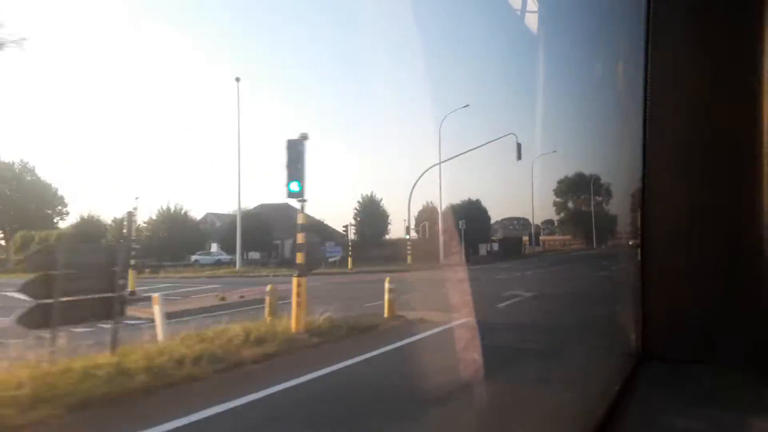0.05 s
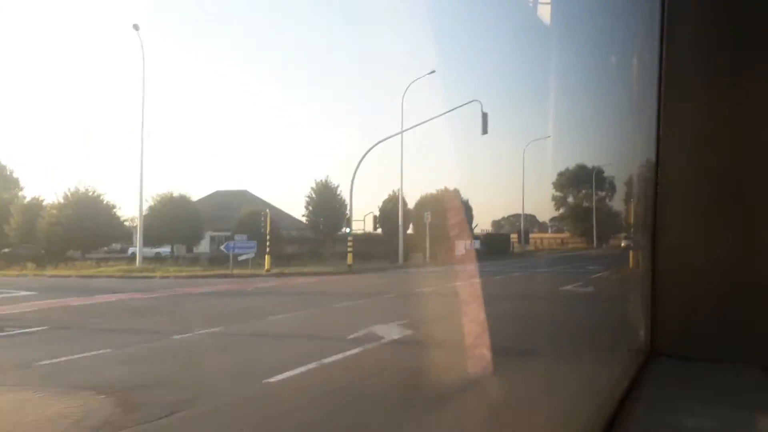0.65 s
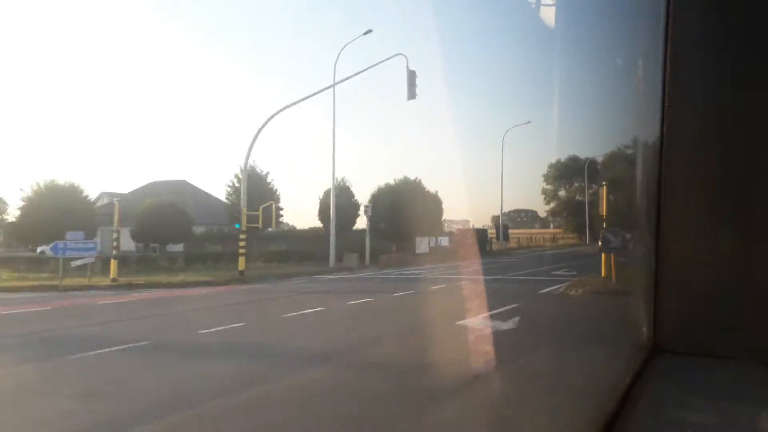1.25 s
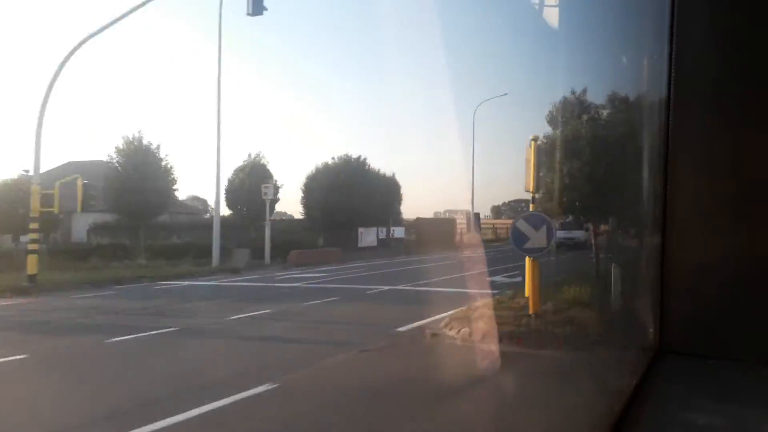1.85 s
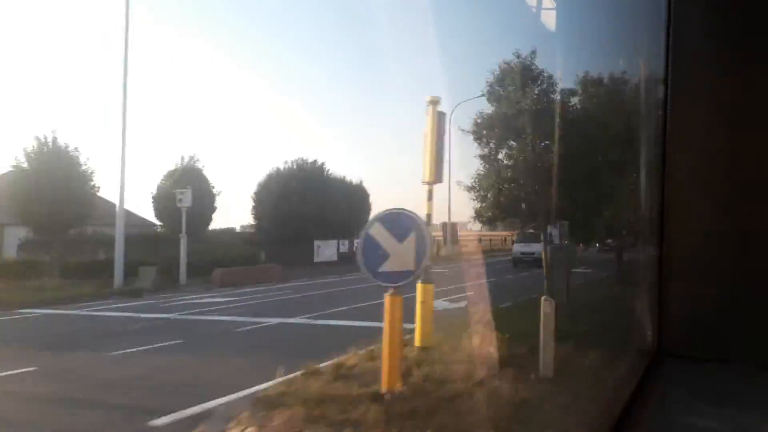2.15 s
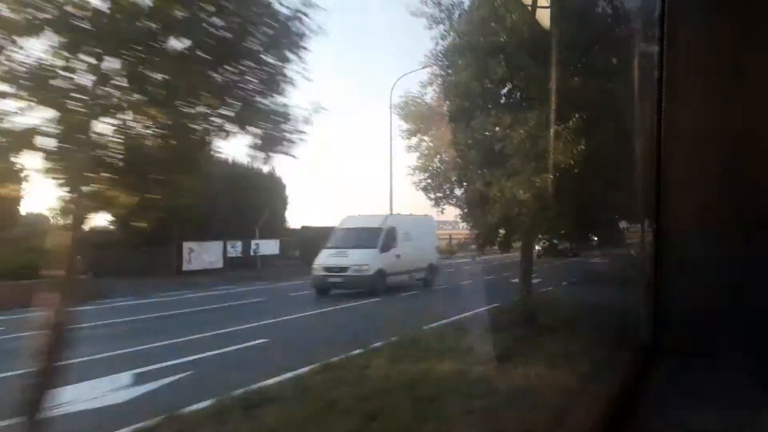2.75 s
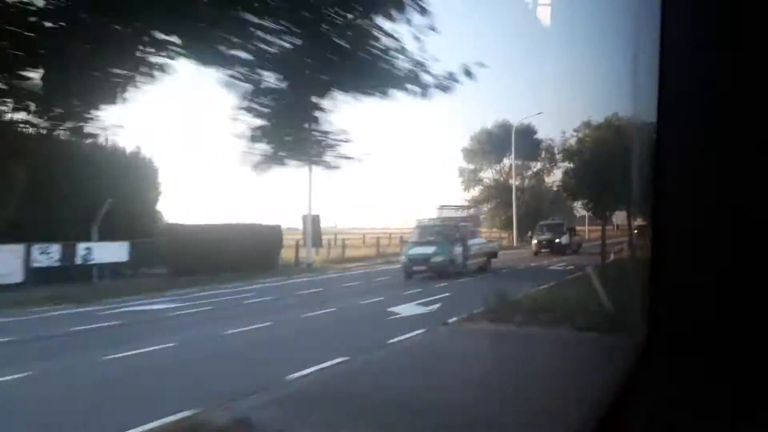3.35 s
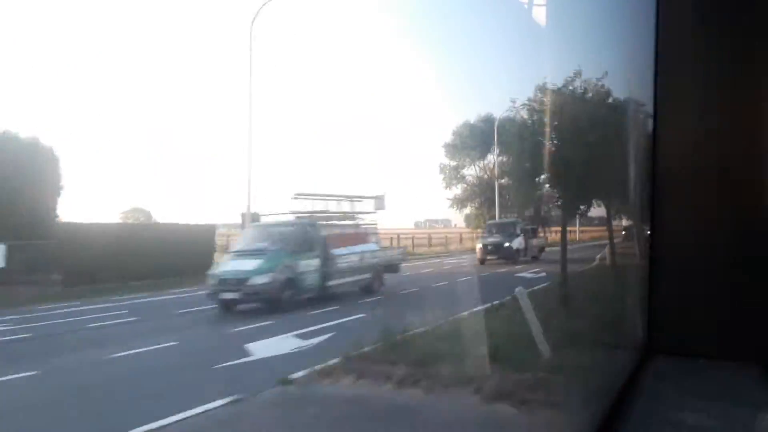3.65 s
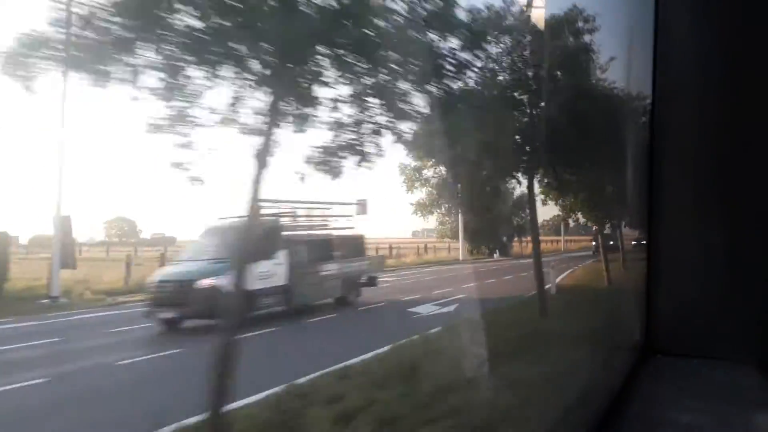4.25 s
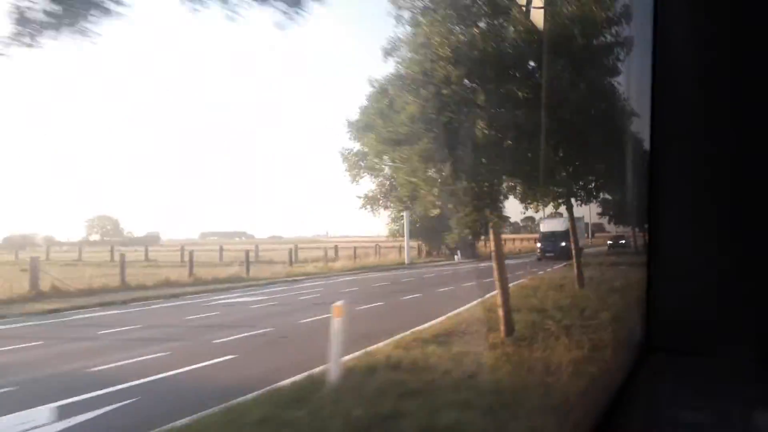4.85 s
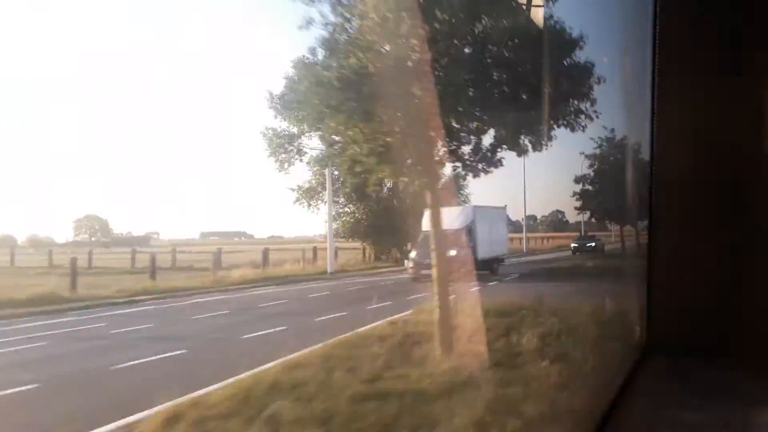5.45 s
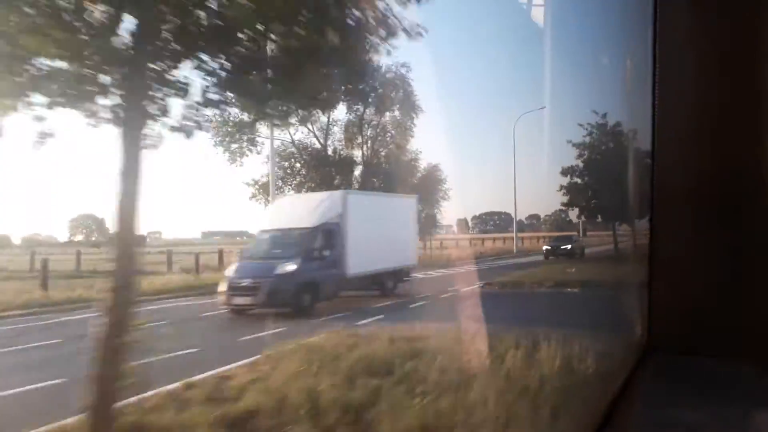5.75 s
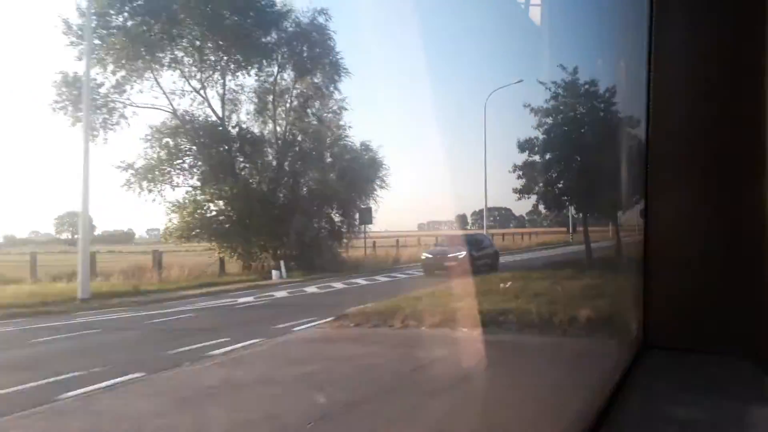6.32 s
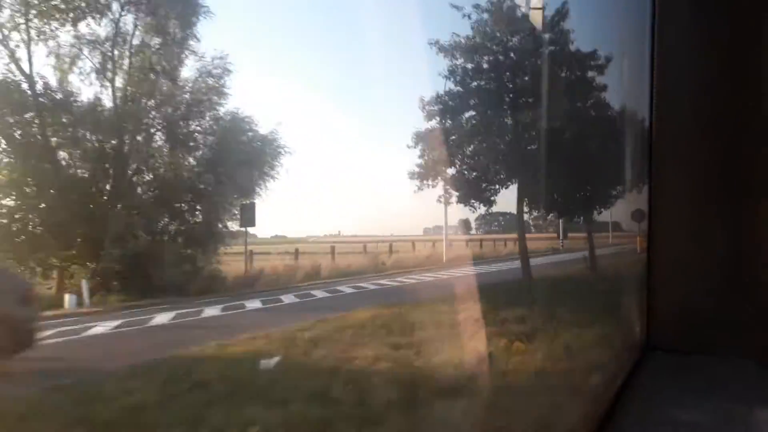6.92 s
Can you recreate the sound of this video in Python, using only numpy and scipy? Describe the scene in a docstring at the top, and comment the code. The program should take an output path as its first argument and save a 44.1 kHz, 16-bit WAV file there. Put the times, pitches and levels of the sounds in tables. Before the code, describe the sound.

Inside a bus, deep road rumble and tyre roar run over the hum of a diesel engine. In the first second or so the wheels thud over road joints, loose fittings clatter and trim squeaks. The ride then smooths out, with a few lighter rattles, while the engine hum and a soft gear whine slowly grow. The microphone is at a window seat, close to the glass and panels.

```python
"""Inside a city bus, crossing a bumpy junction and gathering speed on a country road.
One phone microphone at a window seat, close to glass and panels. The road drums on the body
and the tyres roar over the diesel's hum and a gear whine that makes the panels sing.
Bumps thud, loose fittings rattle and trim squeaks in the small cabin.
Far down in the background, air rushes along the windows and the turbo whistles thinly."""
import sys
import numpy as np
from scipy import signal
from scipy.fft import rfft, irfft
from scipy.io import wavfile

SR = 44100
rng = np.random.default_rng(int(sys.argv[2]) if len(sys.argv) > 2 else 0)


def store_wav(level_fs):
    """Save 16-bit WAV to argv[1]."""
    pcm = np.round(np.clip(np.atleast_2d(level_fs), -1, 1) * 32767)
    wavfile.write(sys.argv[1], SR, pcm.T.astype(np.int16))


N = 316638
T = np.arange(N) / SR

# road roughness over the junction, a smooth stretch and the coarser country road: time_s, level_db
ROAD_ROUGHNESS = [(0, -19.5), (.62, -16.5), (1.05, -21.5), (1.6, -25), (2.3, -22), (2.75, -22.5),
                  (3.4, -20), (4.15, -21.5), (4.7, -20.5), (6.1, -21), (7.18, -21)]
# spectra at the seat of body, tyres, window air and fittings: frequency_hz, relative_db
BODY_SPECTRUM = [(15, -42.5), (24, -38), (41, -38), (56, -16.5), (75, -9.5), (95, -3), (122, -4.5),
                 (150, 0), (180, -1.5), (240, -2), (275, -7.5), (330, -14), (400, -21.5), (600, -80.5)]
TYRE_SPECTRUM = [(230, -30.5), (340, -6), (395, 0.5), (435, -5.5), (485, -4), (525, -12), (570, -9),
                 (680, -14), (810, -13), (900, -17.5), (1100, -21.5), (1450, -27.5), (2000, -47),
                 (3500, -85.5)]
AIR_SPECTRUM = [(900, -11), (1500, -2), (1850, 0.5), (2120, 2), (2400, -4), (3300, -1), (3600, -4.5),
                (4500, -7.5), (5700, -11), (7400, -15), (8400, -30), (9500, -37.5), (11000, -28),
                (15500, -34)]
FITTING_SPECTRUM = [(700, -23), (1800, -1.5), (3200, 0), (5000, 1.5), (7300, -1), (9200, -22),
                    (11000, -9.5), (12500, -8), (15500, -15.5)]
# hum of the engine and its shafts: multiple_of_firing_rate, relative_db
ENGINE_ORDERS = [(1, -8), (2, 5), (2.16, -9.5), (3, 6.5), (3.25, -3), (3.8, -3.5), (4.35, -15), (4.85, 2),
                 (7.75, -19)]
# gear tones: multiple_of_firing_rate, relative_db
GEAR_ORDERS = [(10.87, -5), (11.17, -1), (11.4, -6), (12.5, 0), (12.72, -12), (13.12, -5), (16.1, -1),
               (19.22, -1), (19.6, -1), (20.1, -9), (21.15, -4)]
# panels that sing when a gear tone sweeps through them: centre_hz, width_hz, gain_db
PANEL_RESONANCES = [(566, 7, .5), (643, 30, 1), (815, 50, -14), (984, 18, -7), (1065, 20, -15)]
# load on the drive train as the bus pulls away: time_s, hum_db, whine_gain_db
DRIVE_LOAD = [(0, -23, -48), (1.7, -29, -43), (4.3, -26, -40.5), (7.18, -22, -37)]
# wheels over road joints: start_s, peak_db
ROAD_JOINTS = [(0.378, -6), (0.486, -20), (0.811, -2.5), (0.83, -7.5), (0.861, -5), (1.129, -27)]
# body modes that a bump rings: pitch_hz, t60_s, relative_db
THUD_MODES = [(67, 0.16, -4), (87.3, 0.11, 13.5), (138, 0.2, 4.5), (199.8, 0.21, 1.5), (308, 0.19, -5)]
# cabin air booming as the body heaves: start_s, length_s, pitch_hz, level_db
AIR_BOOMS = [(0.285, 0.48, 95.8, -27), (3.15, 0.49, 72, -32.5), (4.796, 0.5, 92.8, -32.5)]
# spells of chattering fittings: peak_s, rise_db_per_s, fall_db_per_s, level_db, tilt_db_per_octave
CHATTER_SPELLS = [(.86, 12.5, 72, -40.5, -5), (1.24, 20, 110, -41, 2.5), (1.75, 15, 22.5, -60, 3),
                  (3.42, 22.5, 20.5, -54.5, -3.5)]
# single clacks of a fitting: start_s, dry_peak_db, tilt_db_per_octave
FITTING_CLACKS = [(0.044, -31.5, -0.5), (0.279, -28, 2), (.418, -26.5, 0.5), (0.933, -16.5, -1.5),
                  (1.125, -21, 6), (1.282, -25.5, 2), (1.373, -37, 1), (2.032, -29.5, -7), (2.135, -35, -8),
                  (3.235, -38, -2), (3.596, -32.5, -7), (3.716, -30.5, -2), (3.997, -34.5, -6),
                  (4.065, -33.5, -1.5), (6.577, -36, -8)]
# slips of the trim: start_s, end_pitch_hz, start_above_octaves, dry_level_db
TRIM_SLIPS = [(.269, 4050, 0.046, -43), (0.29, 3120, 0.074, -37), (.562, 5960, 0, -37),
              (.593, 4330, 0.07, -40), (.613, 9200, .14, -51), (.636, 6010, 0.031, -31.5),
              (.69, 9150, 0.1, -47), (.717, 5850, 0.45, -31.5), (.849, 7000, .08, -44),
              (.877, 6080, 0.024, -29), (0.956, 6280, .25, -33), (1.003, 10000, 0.11, -41),
              (1.035, 6320, 0.34, -31.5), (1.083, 10300, 0.37, -41), (1.121, 4300, -0.33, -35),
              (1.172, 6300, .2, -40.5), (1.204, 3400, 0.16, -37.5), (1.249, 6270, 0.011, -44),
              (1.288, 2830, 0.011, -40.5), (3.4, 3600, .1, -50)]
# the whistle that the turbo's speed sets: time_s, pitch_hz
TURBO_PITCH = [(1.6, 5030), (3.1, 5110), (3.8, 5380), (4.6, 5370), (5.6, 5230), (7.18, 5200)]


def road(body_db=-19.5, tyre_db=-30.5, air_db=-50, smooth_road_db=-21):
    """The road's grain drums on the body, tyres roar, air rushes past; all grow on rough road."""
    rough_db = curves(ROAD_ROUGHNESS)[0] - smooth_road_db
    grain = walk(14)
    body = noise(BODY_SPECTRUM) * undb(body_db + rough_db + 0.52 * grain)
    # tyres and air follow only a share of the roughness
    tyres = noise(TYRE_SPECTRUM) * undb(tyre_db + 0.73 * rough_db + 0.54 * grain + 0.5 * walk(25))
    air = noise(AIR_SPECTRUM) * undb(air_db + 0.58 * rough_db + 0.5 * walk(30))
    return body + tyres + air


def drive_train(start_hz=48.5, climb_hz_per_s=0.445):
    """The diesel's hum follows the load; gear tones swell as they climb through panel resonances."""
    firing_hz = start_hz + climb_hz_per_s * T
    hum_db, whine_db = curves(DRIVE_LOAD)
    phase = cycle(firing_hz * (1 + 0.0006 * walk(9)))
    hum = sum(undb(db + 1.5 * walk(9)) * np.sin(order * phase + 0.4 * walk(10))
              for order, db in ENGINE_ORDERS)
    whine = 0
    for order, db in GEAR_ORDERS:
        panel_power = sum(undb(gain_db) ** 2 / (1 + (2 * (order * firing_hz - hz) / width_hz) ** 2)
                          for hz, width_hz, gain_db in PANEL_RESONANCES)
        tone = unit(undb(1.5 * walk(12)) * np.sin(order * phase + 0.18 * walk(30)))
        whine += undb(db) * np.sqrt(panel_power) * tone
    return unit(hum) * undb(hum_db) + whine * undb(whine_db)


def bumps(attack_s=0.0047, low_cut_hz=55):
    """Each road joint shoves a wheel and rings the body's low modes; long heaves make the air boom."""
    out, t = np.zeros(N), T[:SR // 2]
    modes = sum(undb(db) * np.sin(2 * np.pi * hz * t) * fade(t, t60) for hz, t60, db in THUD_MODES)
    low_cut = signal.butter(4, low_cut_hz, "high", fs=SR, output="sos")
    thud = signal.sosfilt(low_cut, modes * (1 - np.exp(-t / attack_s)))
    for start_s, peak_db in ROAD_JOINTS:
        add(out, start_s, undb(peak_db) * thud / np.abs(thud).max())
    for start_s, length_s, hz, db in AIR_BOOMS:
        swell = np.hanning(int(length_s * SR))
        boom = swell * np.sin(2 * np.pi * hz * T[:len(swell)])
        add(out, start_s, undb(db) * unit(boom))
    return out


def rattles(taps_per_s=600, scatter_db=3.5, rest_db=-74, tap_t60_s=0.036, clack_t60_s=0.072):
    """Loose fittings chatter in spells that build and die away; now and then one clacks hard."""
    t = T[:SR // 10]
    taps = (rng.random(N) < taps_per_s / SR) * undb(scatter_db * np.clip(rng.standard_normal(N), -2, 2))
    tap_envelope = signal.fftconvolve(taps, fade(t, tap_t60_s))[:N]

    def chatter(tilt_db):
        return unit(colour(tap_envelope * rng.standard_normal(N), FITTING_SPECTRUM, tilt_db))

    out = chatter(0) * undb(rest_db)
    for peak_s, rise, fall, db, tilt_db in CHATTER_SPELLS:
        below_peak_db = np.maximum(rise * (peak_s - T), fall * (T - peak_s))
        out += chatter(tilt_db) * undb(db - below_peak_db)
    for start_s, peak_db, tilt_db in FITTING_CLACKS:
        burst = rng.standard_normal(len(t)) * fade(t, clack_t60_s)
        clack = colour(burst, FITTING_SPECTRUM, tilt_db)
        add(out, start_s, undb(peak_db) * clack / np.abs(clack).max())
    return cabin(out, wet_db=-4)


def squeaks(slip_s=0.026, tremble_hz=270, harmonics_db=(0, -10.5, -24)):
    """Trim sticks and slips: each slip is a rough tone that glides and settles; low ones scrape more."""
    out, size = np.zeros(N), int(slip_s * SR)
    progress = np.linspace(0, 1, size)
    arch = np.sqrt(progress * (1 - progress))
    for start_s, end_hz, octaves, db in TRIM_SLIPS:
        roughness = tremble_hz / end_hz
        tremble = walk(2600, SR // 8)[:size]
        grip = walk(600, SR // 8)[:size]
        glide_hz = end_hz * 2 ** (octaves * (1 - progress) ** 2)
        hz = glide_hz * (1 + roughness * tremble)
        tone = sum(undb(harmonic_db) * np.sin(k * cycle(hz)) * (k * hz < SR / 2)
                   for k, harmonic_db in enumerate(harmonics_db, 1))
        scrape = 1.6 * roughness * noise(FITTING_SPECTRUM, SR // 8)[:size]
        add(out, start_s, undb(db) * unit((tone + scrape) * arch * undb(2.6 * grip)))
    return cabin(out, wet_db=-1)


def turbo(top_speed_db=-61.5, fade_db_per_hz=0.015, whine_hz=7005, whine_db=-73):
    """Faint at the seat: a breathy whistle that fades as the turbo slows, a thin steady whine above."""
    hz = curves(TURBO_PITCH)[0]
    whistle_db = top_speed_db - fade_db_per_hz * (hz.max() - hz)
    whistle = unit(walk(420) * np.sin(cycle(hz + 60 * walk(300))))
    whine = unit(undb(2 * walk(13)) * np.sin(cycle(whine_hz + 9 * walk(6))))
    return whistle * undb(whistle_db) + whine * undb(whine_db)


def cabin(direct, wet_db, t60_s=0.18, build_s=0.003):
    """Direct sound reaches the microphone with dense, short reflections from nearby glass and panels."""
    t = T[:SR // 3]
    tail = rng.standard_normal(len(t)) * fade(t, t60_s) * (1 - np.exp(-t / build_s))
    reflections = signal.fftconvolve(direct, tail / np.sqrt(np.sum(tail ** 2)))[:N]
    return (direct + undb(wet_db) * reflections) / np.sqrt(1 + undb(wet_db) ** 2)


def undb(db):
    """Decibels to gain."""
    return 10 ** (np.asarray(db) / 20)


def unit(x):
    """Scale to rms 1."""
    return x / np.sqrt(np.mean(x ** 2))


def curves(table):
    """Each column of a timed table, at every sample."""
    time_s, *columns = np.transpose(table)
    return [np.interp(T, time_s, column) for column in columns]


def colour(x, spectrum, tilt_db=0):
    """Filter by a spectrum, tilted by tilt_db per octave."""
    hz, db = np.transpose(spectrum)
    tilted_db = db + tilt_db * np.log2(hz / hz[0])
    bin_hz = np.maximum(np.arange(len(x) // 2 + 1) * SR / len(x), 1)
    gain = undb(np.interp(np.log2(bin_hz), np.log2(hz), tilted_db))
    return irfft(rfft(x) * gain, len(x))


def noise(spectrum, size=N):
    """Noise of rms 1 with the given spectrum."""
    return unit(colour(rng.standard_normal(size), spectrum))


def walk(rate, size=N):
    """Random drift of rms 1 that changes about rate times a second."""
    return unit(np.interp(np.arange(size) / SR * rate, np.arange(size), rng.standard_normal(size)))


def cycle(hz):
    """Running phase of a frequency."""
    return 2 * np.pi * np.cumsum(hz) / SR


def fade(t, t60):
    """Exponential decay, 60 dB down after t60 seconds."""
    return np.exp(-np.log(1000) * t / t60)


def add(out, start_s, x):
    """Mix a short sound in at start_s."""
    i = max(int(start_s * SR), 0)
    out[i:i + len(x)] += x[:N - i]


def scene():
    """Everything as heard from the window seat, in mono."""
    return (road() + bumps() + drive_train() + turbo() + rattles() + squeaks())[None]


def record(dry):
    """The phone at the seat cuts the top of the treble."""
    top_hz = 15800
    return signal.sosfilt(signal.ellip(10, 0.1, 80, top_hz, fs=SR, output="sos"), dry)


dry = scene()
out = record(dry)
store_wav(out)
```